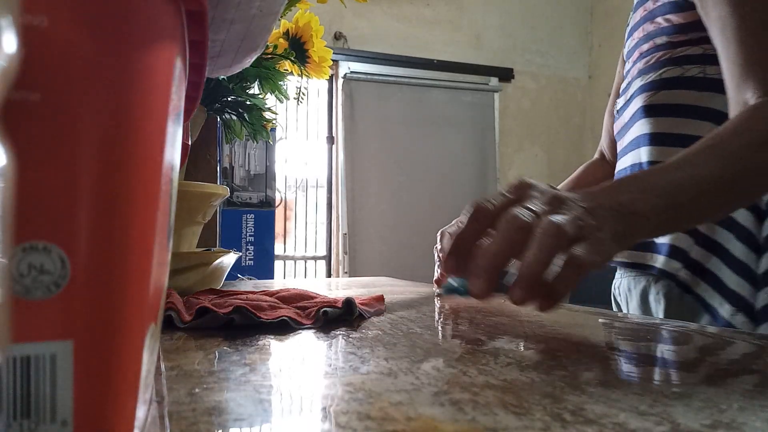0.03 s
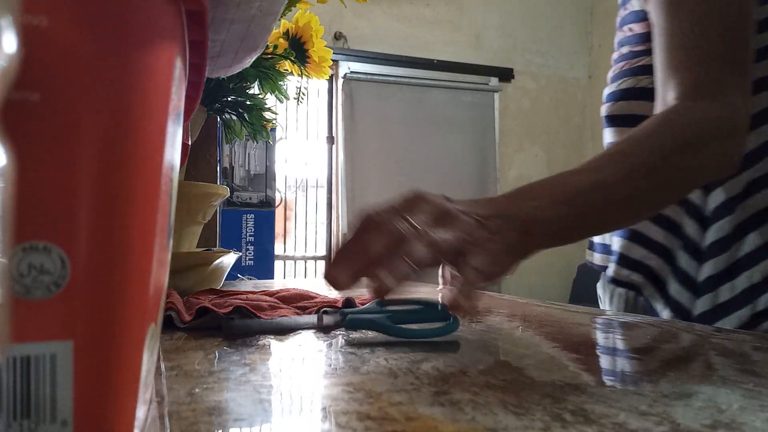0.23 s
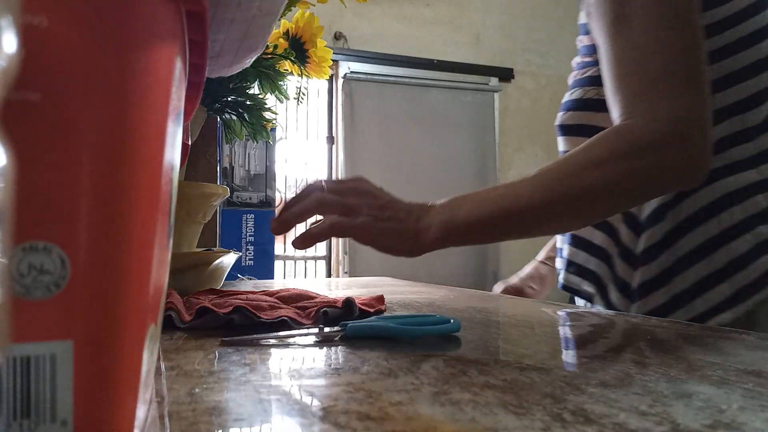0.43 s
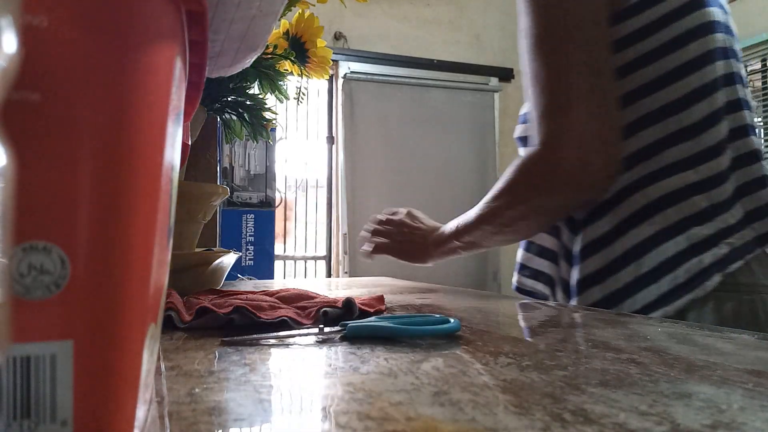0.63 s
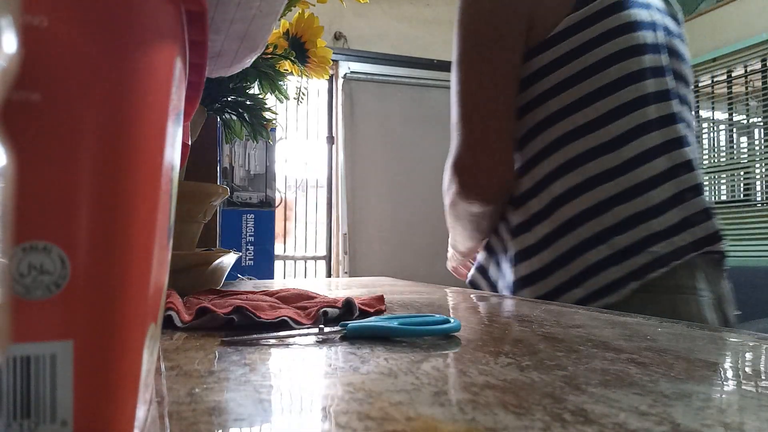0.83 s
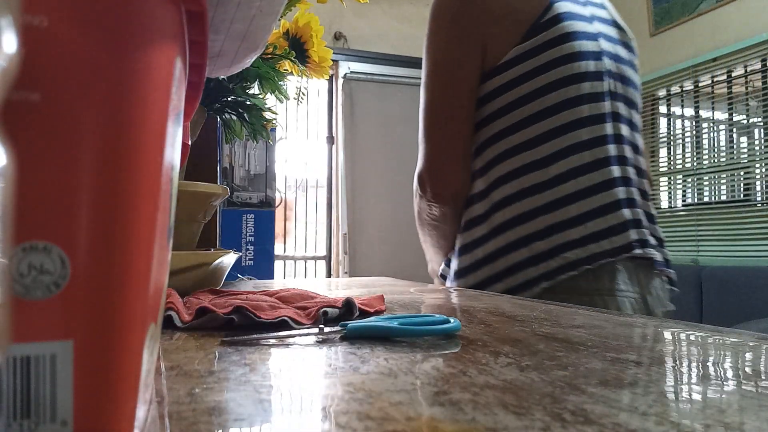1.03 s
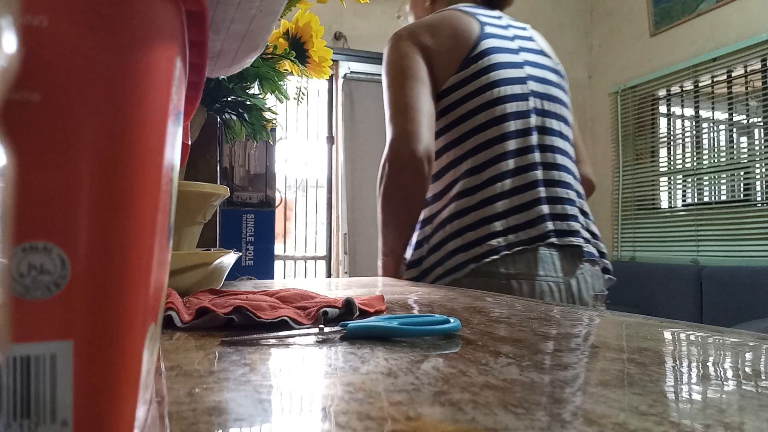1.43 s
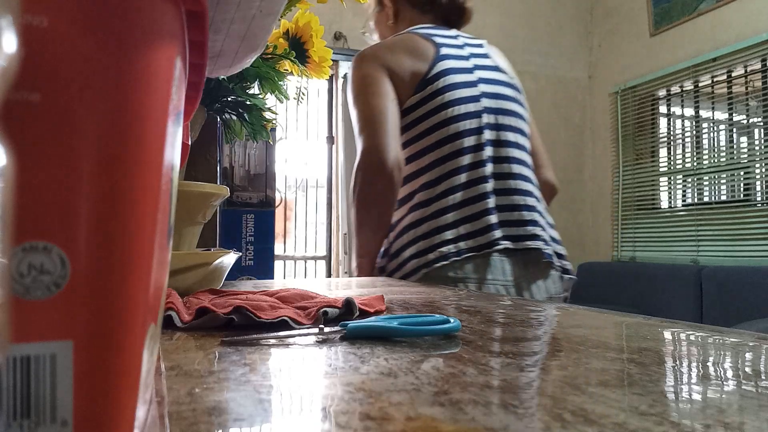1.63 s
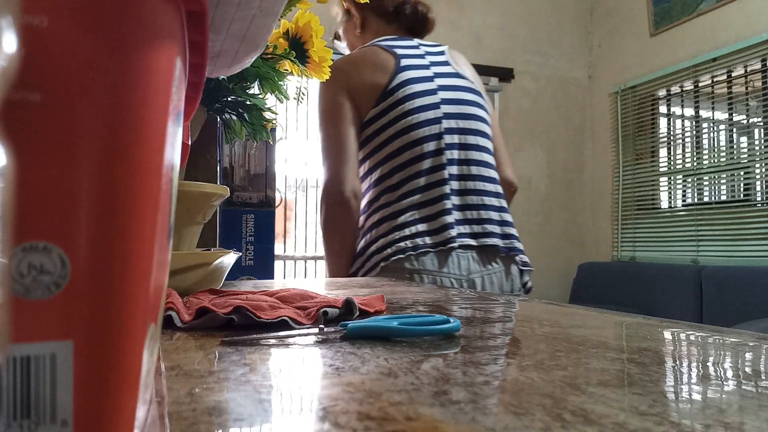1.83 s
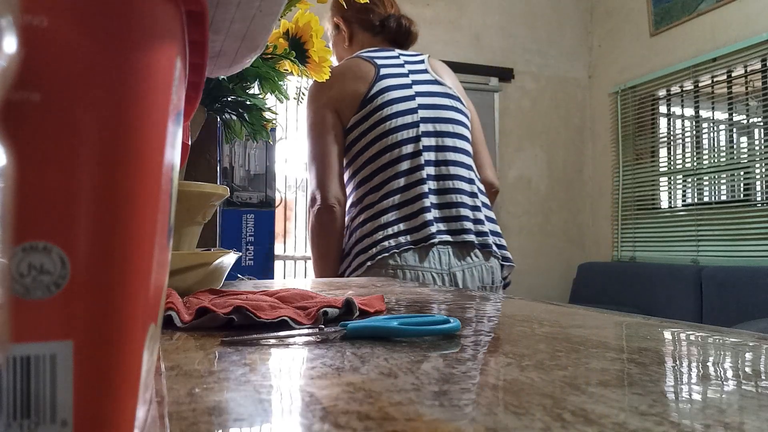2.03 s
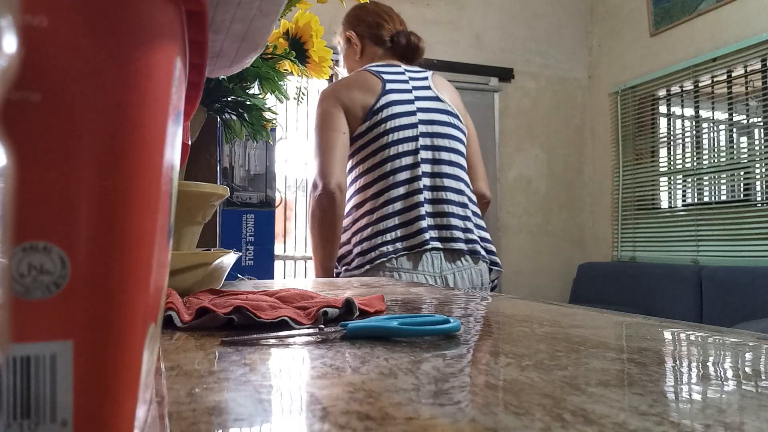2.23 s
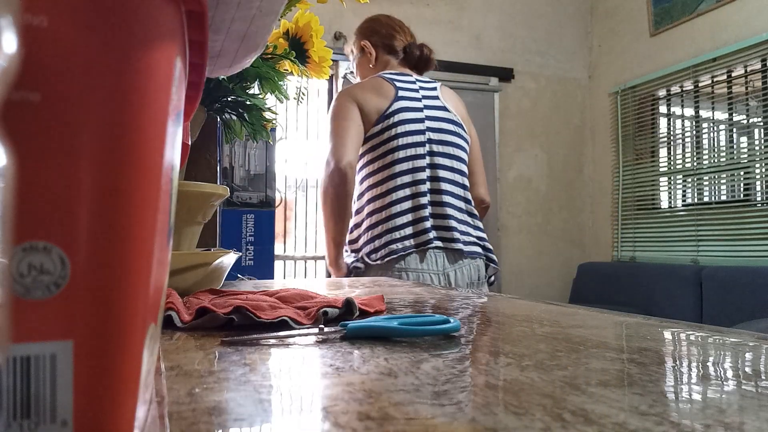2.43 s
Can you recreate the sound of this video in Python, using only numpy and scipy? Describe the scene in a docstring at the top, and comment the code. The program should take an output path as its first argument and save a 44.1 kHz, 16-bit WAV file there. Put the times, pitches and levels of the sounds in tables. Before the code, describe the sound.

Scissors clatter onto a stone table, then someone shuffles softly away in slippers.

```python
"""A small quiet room with a low hum. Plastic-handled scissors drop on a stone table top close to the
microphone: a handle lands, the steel blades clash and ring, and the pair rocks and rattles to rest
while the top thuds. Each impact drives decaying modes and short noise bursts. Then someone shuffles
away in slippers: soles pat and scuff, clothes rustle as grainy friction noise."""
import sys
import numpy as np
from scipy import signal
from scipy.fft import rfft, irfft
from scipy.io import wavfile

SR = 44100
rng = np.random.default_rng(int(sys.argv[2]) if len(sys.argv) > 2 else 0)


def master(y):
    """Save y as 16-bit WAV."""
    cut = np.clip(np.atleast_2d(y).T, -1, 1)
    pcm = np.round(cut * 32767)  # scale
    wavfile.write(sys.argv[1], SR, pcm.astype(np.int16))


N = 110250
TIME_S = np.arange(N) / SR
FREQ_HZ = np.maximum(np.fft.rfftfreq(N, 1 / SR), 1)


def undb(db):
    return 10 ** (np.asarray(db) / 20)


def along(hz, table, column=1):
    """Table column interpolated over log frequency."""
    table = np.array(table)
    return np.interp(np.log(hz), np.log(table[:, 0]), table[:, column])


def decay(t60_s, age_s=TIME_S):
    return np.exp(-np.log(1000) * age_s / t60_s)


def unit_energy(x):
    return x / np.sqrt(np.sum(x ** 2, axis=-1, keepdims=True))


def pan(left_minus_right_db):
    return undb(np.array([[1], [-1]]) * left_minus_right_db / 2)


def convolve(x, response):
    return signal.fftconvolve(np.atleast_2d(x), np.atleast_2d(response), axes=-1)[:, :N]


def impulses(table, column):
    """One impulse per row, at the level in the given column."""
    out = np.zeros(N)
    for row in table:
        out[int(row[0] * SR)] += undb(row[column])
    return out


def ring(modes, rise_cycles):
    """Decaying sines, low ones building up later; unit total energy."""
    out = 0
    for k, (pitch_hz, t60_s, level_db) in enumerate(modes):
        rise = 1 - np.exp(-(TIME_S * pitch_hz / rise_cycles) ** 2)
        mode = np.sin(2 * np.pi * pitch_hz * TIME_S) * decay(t60_s) * rise
        out = out + (-1) ** k * undb(level_db) * unit_energy(mode)
    return unit_energy(out)


def burst(spectrum, t60_s):
    """Many close modes dying together: decaying noise through a minimum-phase filter."""
    cepstrum = irfft(np.log(undb(along(FREQ_HZ, spectrum))), N)
    response = np.exp(rfft(2 * cepstrum * (np.arange(N) < N // 2)))
    noise = rng.standard_normal(N) * decay(t60_s)
    return unit_energy(irfft(rfft(noise) * response, N))


def stereo_burst(spectrum, t60_s):
    return np.array([burst(spectrum, t60_s) for _ in range(2)])


def place_near(x, pan_db, lag_s=0.00026):
    """Panned close source; reaches the right channel later."""
    delayed = irfft(rfft(x) * np.exp(-2j * np.pi * FREQ_HZ * lag_s), N)
    return np.array([x, delayed]) * pan(pan_db)


# freq_hz, left_minus_right_db
FAR_BALANCE = [(60, 3.5), (200, 4), (700, 6), (1300, 8), (2400, 8), (4400, -0.5), (15000, 0)]

def far_noise(gain, coherent_below_hz=480):
    """Distant stereo noise, rms 1; channels alike only in the bass."""
    mid, side = np.exp(2j * np.pi * rng.random((2, len(FREQ_HZ))))
    coherence = 1 / (1 + (FREQ_HZ / coherent_below_hz) ** 2)
    both = mid * np.sqrt(1 + coherence) + np.array([[1], [-1]]) * side * np.sqrt(1 - coherence)
    noise = irfft(both * gain * pan(along(FREQ_HZ, FAR_BALANCE)), N)
    return noise / np.sqrt(np.mean(noise ** 2))


def shaped_noise(spectrum):
    return far_noise(undb(along(FREQ_HZ, spectrum)))


# freq_hz, level_db
AIR_SPECTRUM = [(18, -61.5), (30, -56), (55, -20), (75, -13.5), (295, -13.5), (473, -18.5), (526, -3.5),
                (600, -14), (649, -18), (760, -8.5), (1350, -11), (2480, -17.5), (2750, -27.5), (7270, -26),
                (16000, -34.5)]
# pitch_hz, width_hz, level_db
ROOM_RESONANCES = [(72.1, 6.2, -68), (119, 5.64, -80.5), (509, 14, -81), (654, 20, -73.5),
                   (850.4, 20, -72.5), (1112, 23, -72.5), (1144, 40, -74)]

def room_tone(air_db=-63.5, hum_hz=73.7, hum_db=-72.5):
    """Faint air noise, narrow resonances, and a hum that wavers against the rumble around it."""
    resonances = sum(undb(level_db) * far_noise(1 / (1 + (2 * (FREQ_HZ - pitch_hz) / width_hz) ** 2))
                     for pitch_hz, width_hz, level_db in ROOM_RESONANCES)
    hum = undb(hum_db) * np.sin(2 * np.pi * hum_hz * TIME_S) * pan(along(hum_hz, FAR_BALANCE))
    return undb(air_db) * shaped_noise(AIR_SPECTRUM) + resonances + hum


# centre_s, sigma_s, rub_db, rustle_db, hiss_db
CLOTH_SWISHES = [(0.06, 0.082, -57, -61, -66), (0.169, 0.033, -54, -90, -71),
                 (0.532, 0.051, -58.5, -76, -63.5), (0.81, 0.049, -58.5, -64, -65.5),
                 (0.96, 0.018, -66, -73.5, -73), (1.139, 0.082, -63, -65.5, -97),
                 (1.319, 0.047, -68, -76, -65.5), (1.392, 0.047, -60.5, -64.5, -68.5),
                 (1.552, 0.029, -59.5, -48, -53), (1.754, 0.025, -55.5, -57.5, -60.5),
                 (1.89, 0.048, -62.5, -61, -66), (1.982, 0.04, -57.5, -63, -63.5),
                 (2.139, 0.066, -58.5, -64, -63.5), (2.37, 0.029, -67.5, -78, -65.5)]
# freq_hz, level_db
RUB_SPECTRUM = [(60, -8.5), (160, -0.5), (330, -1.5), (520, 2.5), (850, 2.5), (1150, 4.5), (1600, -8),
                (3000, -12.5), (8000, -43.5)]
RUSTLE_SPECTRUM = [(400, -14.5), (1200, -3), (2000, -2), (3100, 1), (3700, -5), (4400, -9.5), (5300, -14.5),
                   (7500, -29), (16000, -31.5)]
HISS_SPECTRUM = [(1500, -18), (4000, -2), (5500, 0), (8500, -3.5), (12500, -2), (15500, -7.5),
                 (16500, -30.5)]

def cloth_swishes(grain_db=1, grain_rate_hz=71):
    """Cloth and sliding soles: grainy friction noise swells and fades with each movement."""
    knots_s = np.arange(N // 50) / grain_rate_hz
    grain = undb(grain_db * np.interp(TIME_S, knots_s, rng.standard_normal(len(knots_s))))
    out = 0
    for k, spectrum in enumerate((RUB_SPECTRUM, RUSTLE_SPECTRUM, HISS_SPECTRUM)):
        power = sum(undb(levels_db[k]) ** 2 * np.exp(-.5 * ((TIME_S - centre_s) / sigma_s) ** 2)
                    for centre_s, sigma_s, *levels_db in CLOTH_SWISHES)
        out = out + shaped_noise(spectrum) * np.sqrt(power)
    return out * grain


# start_s, clack_db, thud_db, tick_db
HANDLE_KNOCKS = [(0.2423, 5, -4.5, -3.5), (0.2611, 1.5, 2, -10), (0.2757, 4, 0.5, -4.5),
                 (0.2824, -32, -3, -15), (0.3121, -10, -5, -30), (0.3187, -6, -26, -8),
                 (0.3429, 6, -0.5, -0.5), (0.3529, -4, -5, -21), (0.3570, 1.5, -7.5, -11),
                 (0.3667, -35, 2, -7), (0.3989, -6.5, -4.5, -35), (0.4029, -28, -1.5, -33),
                 (0.4104, 1, -8.5, -11.5), (0.4117, -4.5, -15, -6), (0.4215, -11.5, -18, -24.5),
                 (0.4333, -22, -6, -50), (0.4510, -30, -3.5, -52)]
# pitch_hz, t60_s, level_db
HANDLE_MODES = [(660, 0.0188, -7.5), (969, .013, -2.5), (1566, .008, -10.5), (2030, 0.019, -9),
                (2400, .011, -2), (2915, 0.0092, 0), (4470, 0.0052, -3), (5560, 0.023, -5),
                (5895, 0.027, -13.5), (7390, .006, -11)]
# freq_hz, level_db
RATTLE_SPECTRUM = [(300, -11), (700, -0.5), (1400, 8), (1900, -1.5), (2600, 0.5), (3300, 0), (3900, -9.5),
                   (5000, -15), (6500, -19), (12000, -22)]

def handle_clacks(cutoff_at_0db_hz=7420, db_per_octave=4, rattle_db=-6.5):
    """Plastic clacks and rattles on stone. Weaker knock: longer contact, duller push."""
    force_spectrum = 0
    for start_s, clack_db, *_ in HANDLE_KNOCKS:
        cutoff_hz = cutoff_at_0db_hz * 2 ** (clack_db / db_per_octave)
        lowpass = 1 / (1 + 1j * np.sqrt(2) * FREQ_HZ / cutoff_hz - (FREQ_HZ / cutoff_hz) ** 2)
        delay = np.exp(-2j * np.pi * FREQ_HZ * int(start_s * SR) / SR)
        force_spectrum = force_spectrum + undb(clack_db) * delay * lowpass
    clack = place_near(ring(HANDLE_MODES, rise_cycles=1.1), pan_db=9.5)
    rattle = undb(rattle_db) * stereo_burst(RATTLE_SPECTRUM, t60_s=0.087) * pan(7)
    return convolve(irfft(force_spectrum, N), clack + rattle)


# pitch_hz, t60_s, level_db
STONE_MODES = [(116.45, 0.312, -9), (180.4, 0.31, -1.5), (234.6, .15, -1), (268.4, 0.11, 5.5),
               (364.2, 0.23, 1.5), (405, 0.06, 1.5), (513, 0.091, -21), (645.1, .15, 5), (696.5, 0.19, -3),
               (873, 0.38, -12), (963, .18, -7), (1126, .24, -9.5)]
# freq_hz, level_db
THUD_SPECTRUM = [(40, -19), (100, -9), (150, -3.5), (230, -0.5), (315, -8.5), (450, 0.5), (700, 5),
                 (1200, -5.5), (2500, -9.5), (6000, -45.5)]

def table_thuds(modes_db=-3):
    """Each handle knock drives the stone top: low modes plus a dull burst."""
    top = undb(modes_db) * ring(STONE_MODES, rise_cycles=0.95) + burst(THUD_SPECTRUM, t60_s=0.024)
    return convolve(impulses(HANDLE_KNOCKS, column=2), place_near(top, pan_db=4.5))


# freq_hz, level_db
TICK_SPECTRUM = [(1000, -12.5), (3000, 1), (5500, 14.5), (6500, 1.5), (8000, -5.5), (9000, 2), (13000, -10),
                 (16000, -6.5)]

def handle_ticks():
    """A sharp, bright burst at each contact with the stone."""
    tick = place_near(burst(TICK_SPECTRUM, t60_s=0.007), pan_db=-0.5)
    return convolve(impulses(HANDLE_KNOCKS, column=3), tick)


# start_s, clash_db, ring_db
BLADE_STRIKES = [(0.2604, 7, 4.5), (0.2646, -10, -14), (0.2757, -1.5, -11.5)]
# pitch_hz, t60_s, level_db
BLADE_MODES = [(1697, 0.24, -5.5), (2390, 0.09, -1.5), (2743, 0.1996, 3.5), (2805, 0.23, -17),
               (3350, .025, 6.5), (5378, 0.18, -4), (7040, .1, -8.5), (10300, .04, -10), (12300, .03, -9)]
# freq_hz, level_db
CLASH_SPECTRUM = [(300, -22), (1100, -4.5), (1900, -0.5), (2500, 4), (3400, -26.5), (4000, -9), (5200, -10),
                  (6400, -11), (7400, -7), (9000, -17.5), (10400, -5.5), (12500, -20), (16000, -13.5)]
SHIMMER_SPECTRUM = [(1500, -32.5), (3000, 8), (5000, 8), (6400, -2.5), (7500, 0.5), (9000, -4),
                    (10500, 0.5), (13000, -1), (16000, -12)]
# freq_hz, left_minus_right_db
BLADE_BALANCE = [(1000, -3), (2500, -1.5), (5000, 3), (8000, -2), (13000, 0)]

def blade_clashes(shimmer_db=-2):
    """Struck steel: a short clash, ringing modes and a dense high shimmer."""
    clash = convolve(impulses(BLADE_STRIKES, column=1), stereo_burst(CLASH_SPECTRUM, t60_s=0.013))
    shimmer = undb(shimmer_db) * stereo_burst(SHIMMER_SPECTRUM, t60_s=0.1785)
    modes = place_near(ring(BLADE_MODES, rise_cycles=1.1), pan_db=0)
    ringing = convolve(impulses(BLADE_STRIKES, column=2), modes + shimmer)
    return irfft(rfft(clash + ringing) * pan(along(FREQ_HZ, BLADE_BALANCE)), N)


# start_s, level_db
FLAT_LANDINGS = [(0.4040, -2.7), (0.4085, -0.89)]
# pitch_hz, t60_s, level_db
CLUNK_MODES = [(374, 0.089, -1.6), (498, 0.025, -0.67), (677, 0.045, -2.2)]

def landing_clunk():
    """The pair lands flat: two quick blows on short, low modes."""
    clunk = place_near(ring(CLUNK_MODES, rise_cycles=0.95), pan_db=9.5)
    return convolve(impulses(FLAT_LANDINGS, column=1), clunk)


# freq_hz, t60_s, level_db
REVERB_BANDS = [(100, .22, -12), (300, 0.54, -18.5), (600, 0.17, -10), (1000, 0.092, -7.5),
                (2600, 0.29, -15), (5000, 0.15, -21), (10000, 0.15, -7), (15880, .3, -13.5)]

def room_reverb(x, onset_s=0.005):
    """Diffuse reflections, each octave with its own decay."""
    noise_spectrum = rfft(far_noise(1))
    centres_hz = 62.5 * 2 ** np.arange(9)
    rise = 1 - np.exp(-(TIME_S / onset_s) ** 2)
    tail = 0
    for hz, weights in zip(centres_hz, np.eye(len(centres_hz))):
        band = irfft(noise_spectrum * np.interp(np.log(FREQ_HZ), np.log(centres_hz), weights), N)
        envelope = unit_energy(rise * decay(along(hz, REVERB_BANDS, column=1)))
        tail = tail + band * envelope * undb(along(hz, REVERB_BANDS, column=2))
    return convolve(x, tail)


# start_s, sole_db, scuff_db, scuff_t60_s
SLIPPER_STEPS = [(1.437, -47, -47.5, 0.89), (2.051, -44, -47.5, 0.44)]
# freq_hz, level_db
SOLE_SPECTRUM = [(100, -42), (280, -8), (380, -5), (520, 2.5), (750, -5), (1200, -23), (2500, -11),
                 (8000, -52)]
SCUFF_SPECTRUM = [(180, -52), (300, -22), (537, -4), (870, -12.5), (1190, -1), (1640, -12), (3580, -7),
                  (4300, -10.5), (16000, -18)]

def slipper_steps(attack_s=0.0063, sole_t60_s=0.22):
    """A soft sole pats the floor and scuffs; the room draws it out."""
    sole_noise, scuff_noise = shaped_noise(SOLE_SPECTRUM), shaped_noise(SCUFF_SPECTRUM)
    out = 0
    for start_s, sole_db, scuff_db, scuff_t60_s in SLIPPER_STEPS:
        age_s = np.maximum(TIME_S - start_s, 0)
        pat = sole_noise * undb(sole_db) * decay(sole_t60_s, age_s)
        scuff = scuff_noise * undb(scuff_db) * decay(scuff_t60_s, age_s)
        out = out + (1 - np.exp(-age_s / attack_s)) * (pat + scuff)
    return out


def scene():
    scissors = handle_clacks() + table_thuds() + handle_ticks() + blade_clashes() + landing_clunk()
    return scissors + room_reverb(scissors) + slipper_steps() + cloth_swishes() + room_tone()


LOW_CUT_HZ, HIGH_CUT_HZ = 35, 16100

def record(dry):
    """Recorder: low cut, soft clip, steep high cut."""
    thinned = signal.sosfilt(signal.butter(2, LOW_CUT_HZ, "high", fs=SR, output="sos"), dry)
    return signal.sosfilt(signal.ellip(8, .2, 70, HIGH_CUT_HZ, fs=SR, output="sos"), np.tanh(thinned))


dry = scene()
out = record(dry)
master(out)
```